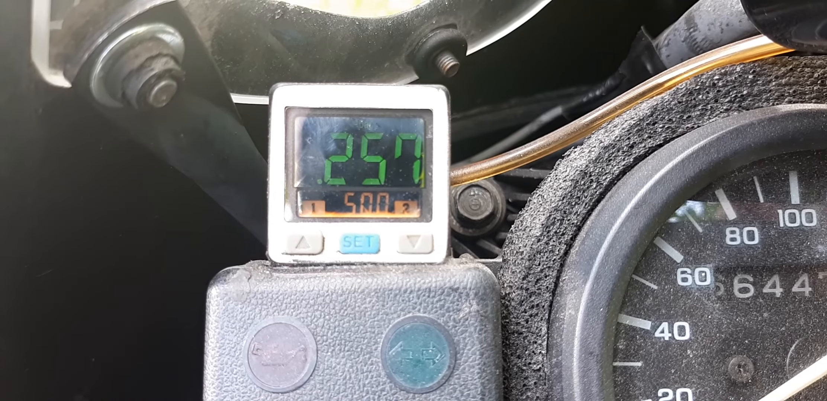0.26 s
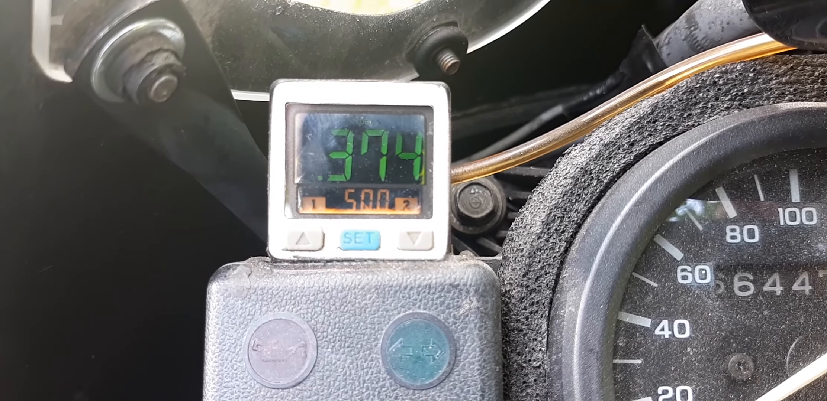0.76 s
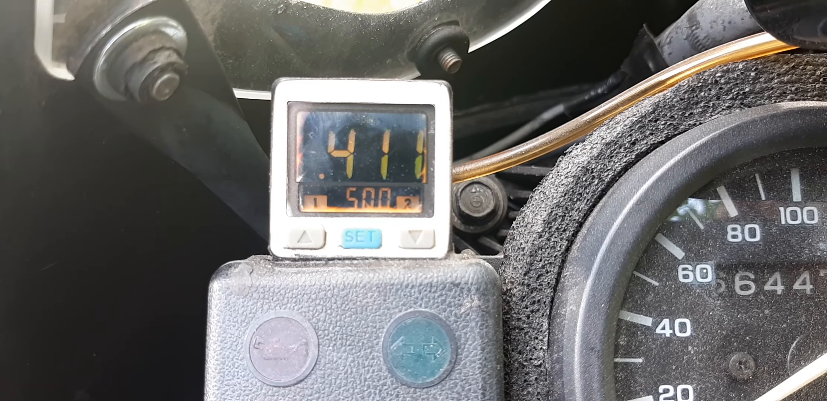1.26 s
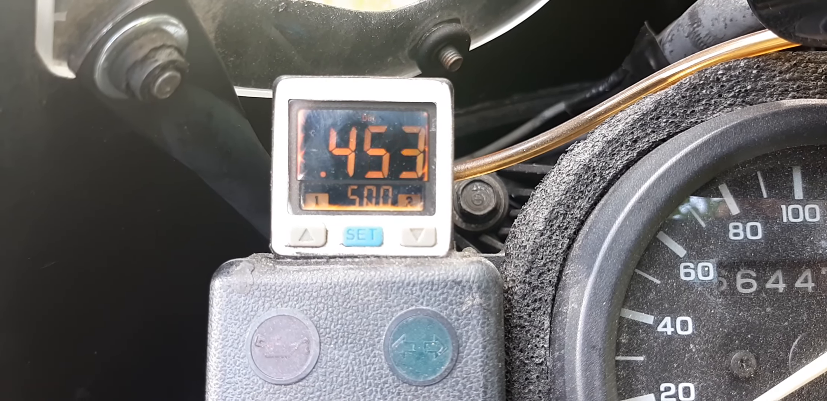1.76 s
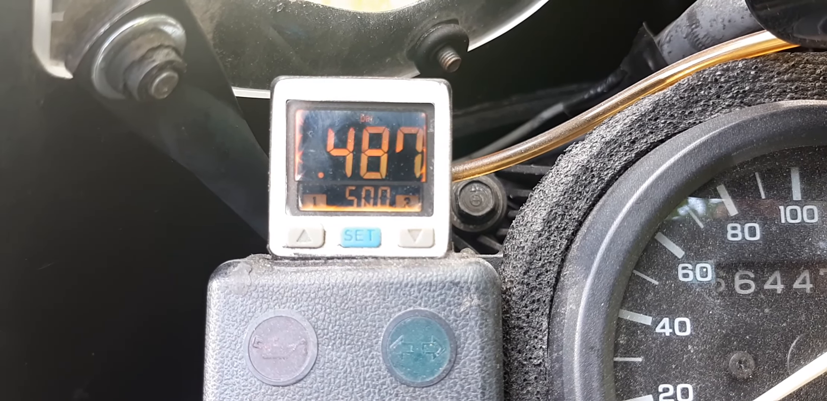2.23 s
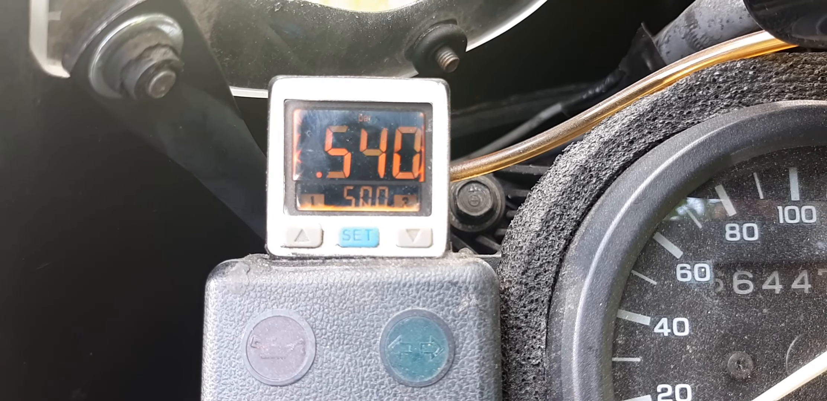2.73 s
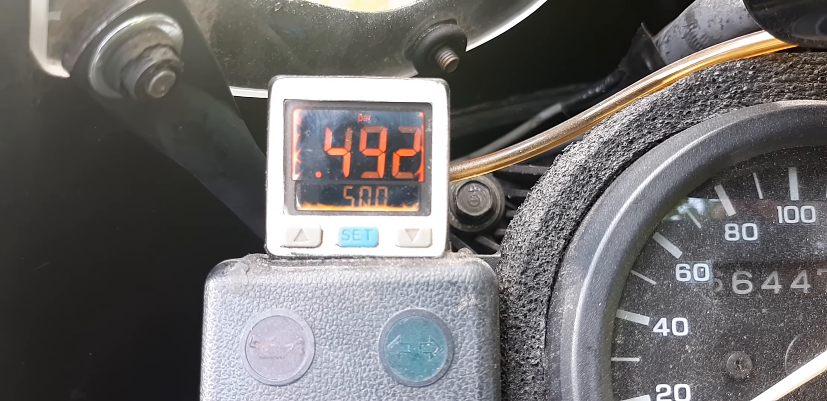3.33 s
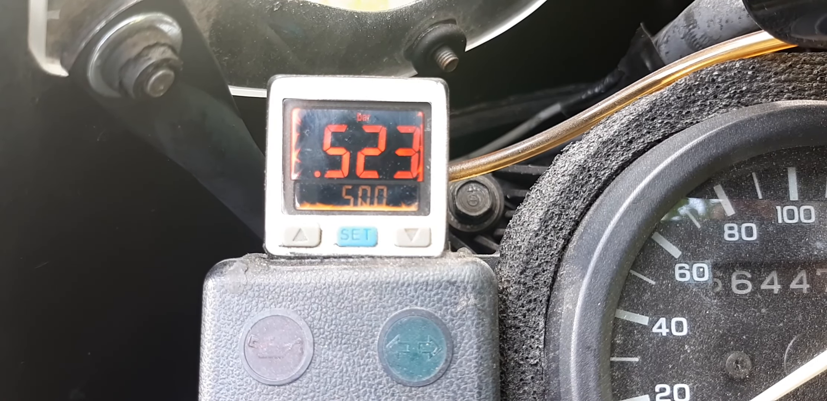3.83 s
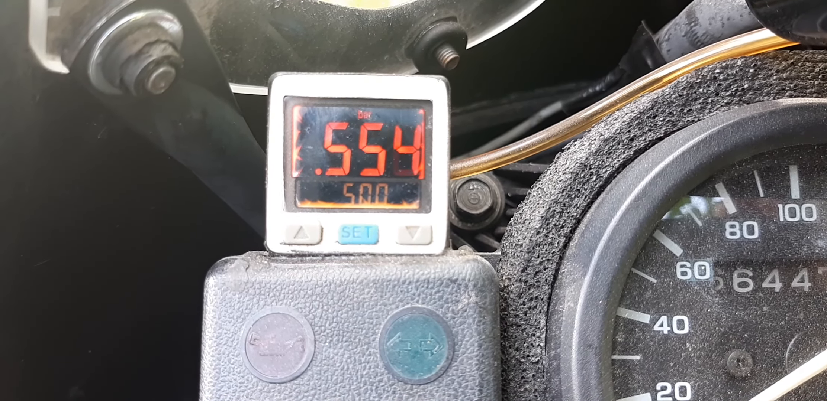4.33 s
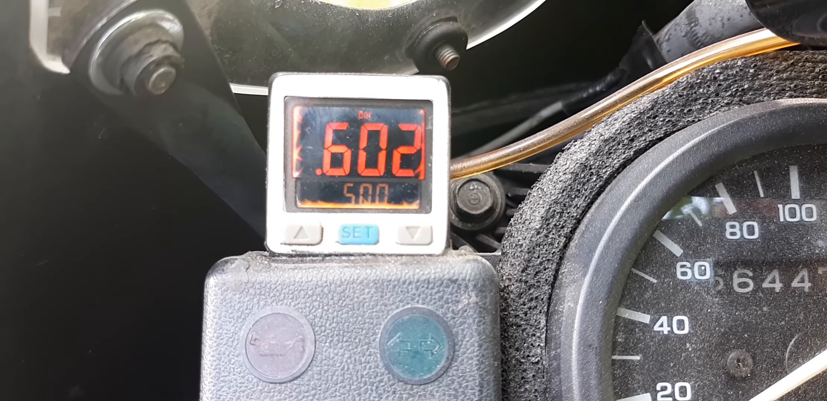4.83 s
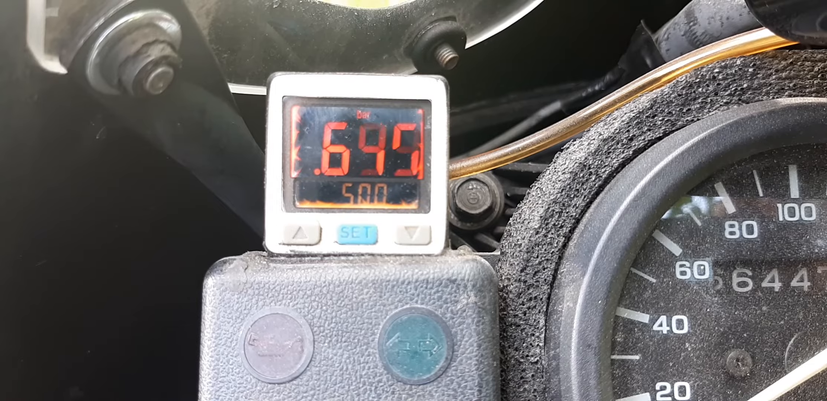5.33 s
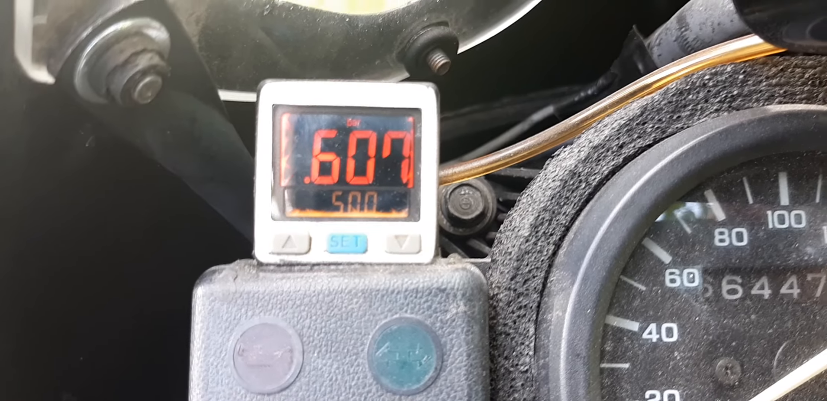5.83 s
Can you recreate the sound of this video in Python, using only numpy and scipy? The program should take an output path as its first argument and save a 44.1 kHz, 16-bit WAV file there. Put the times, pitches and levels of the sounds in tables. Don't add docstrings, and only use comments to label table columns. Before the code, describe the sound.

Close stereo pickup outdoors beside a motorcycle: a little piston pump chatters rapidly and evenly, buzzing and rasping, its tone shifting slightly as pressure builds. A crisp click switches it off, the piston stumbles through its last strokes and stops within a fraction of a second, air puffs out thinly, and a very quiet background of insects, tiny ticks and a brief far bird is left.

```python
import sys
import numpy as np
from scipy import signal
from scipy.io import wavfile
from scipy.ndimage import uniform_filter1d

SR = 44100
rng = np.random.default_rng(int(sys.argv[2]) if len(sys.argv) > 2 else 0)


def invert_db(level):
    return 10 ** (np.asarray(level, dtype=float) / 20)


def waveform_to_disk(signal):
    frames = np.transpose(np.atleast_2d(signal))
    scaled = np.clip(frames, -1, 1) * 32767
    samples = np.round(scaled).astype(np.int16)
    wavfile.write(sys.argv[1], SR, samples)


N = 268569
TIME = np.arange(N) / SR

# (time [s], speed [turns/s])
SPEED = [(0, 32.944), (.9, 32.859), (1.4, 32.744), (2.2, 32.831), (2.8, 33.111), (3.4, 33.2), (4.4, 33.5),
         (5.3, 33.725)]
# (time [s], position [turns])
COASTING = [(5.3205, 176), (5.368, 177), (5.385, 177.3), (5.43, 177.57), (5.481, 178), (5.56, 178.18),
            (6.1, 178.19)]
START_TURN, LAST_DRIVEN_S = -.0245, 5.2854
DRIVEN_TURNS = 175

# (place [turn], level at low pressure [dB], level at high pressure [dB], push +1 or pull -1)
AIR_PULSES = [(0, 6, 2, 1), (0.03, -6, -0.5, -1), (0.097, -4, -9, -1), (0.159, -2, -3, 1),
              (0.229, 0, -7, 1), (0.292, -5.5, -16.5, 1), (.565, -2, -7.5, 1), (0.604, -3.5, -1.5, -1),
              (0.96, -15, -18, -1)]
PANEL_KNOCKS = [(.01, 9, 1.5, 1), (.37, 9.5, 5, 1), (.72, 1, 8, 1), (.87, -12, -22, 1)]
REED_SLAPS = [(.235, 1, 3.5, 1), (.39, -10, -5.5, 1), (0.99, -18, -4.5, 1)]
BLASTS = [(-.01, -0.5, 1.5, 1), (.04, 3.5, -1.5, 1), (.44, -19.5, -10.5, 1), (.77, -28, -12.5, 1)]

# (pitch [Hz], width [Hz], level [dB], left-right balance [dB], left lead [rad], likeness of both sides [0-1])
HOUSING = [(183.6, 110, -15, 1, -1, 0.2), (275.3, 16, -4, -5.5, 2.9, 0.86), (310, 42, -5, -13.5, 3.5, 0.5),
           (474, 140, -0.5, 3.5, 0, 0.3), (580, 130, -8, -15, 1, 0), (634, 96, -15.5, 0, 4.5, 0.93),
           (860, 25, -15.5, 5.5, -2, 0), (1016, 160, -15.5, 6, 5.5, 0.98)]
PANEL = [(958, 224, -7, 3.5, 3.5, 0.72), (1280, 36, -3, -4, -2, 0.9), (1443.5, 76, 2, -10.5, 3, 0.96),
         (1482, 36, 3, 2.5, 3.5, 0.97)]
REED = [(1880, 36, 0, -4.1, -.2, .97), (2150, 200, -12, -.5, -.3, .7), (1670, 110, -14, -1, 2.5, .8)]
GEARBOX = [(2400, 600, -4, 0, 1.5, 1), (2944, 41, 4, 4, 3, 0.56), (3205, 180, -5.5, 0, -1.5, 0.3),
           (3804, 230, -3.5, 2.5, -1.6, 0.59), (4190, 72, -1.5, 3.5, -0.5, 0.11),
           (4580, 110, 1, -2.5, 1.5, 0.88), (5530, 2300, -16.5, 9, -0.5, 0.32),
           (10100, 5200, -21, -1, -11.5, 0.96)]
HEAD = [(2900, 2900, -11, 1, 0.5, 0.23), (5230, 460, 1.5, -3.5, -3.5, 0.31),
        (5867, 234, 0, -11, -1.04, 0.53), (6650, 170, -8.5, -1.5, -1.5, 0.32),
        (8200, 170, -18, 8.7, -0.2, 0.21), (8950, 120, -24.5, -8.5, 9, 0.6),
        (10120, 570, -9, -0.5, 4, 0.48), (11180, 170, -12.5, 6.5, -2, .35),
        (12130, 240, -3.5, -10, 1.77, .85), (12830, 2000, -13, -6, 3.5, 0.33),
        (15200, 1700, -25.5, 16, -9, .2)]
SWITCH_BODY = [(2200, 370, 5, -7, 0, 0.41), (3700, 290, 3, -3, 0.0059, 0.35),
               (6000, 750, 1.5, 0.5, 0.0035, 0.49), (8500, 2900, -10.5, -5, 0.0034, 0.36),
               (12200, 1900, -3.5, -2.5, 0.0042, 1), (15000, 2000, -20, -2, 0.0039, .4)]
LEAK_WHISTLE = [(5320, 160, 0, -2, 0, .5), (5900, 1400, -14, -2, 0, .3)]
OUTDOORS = [(60, 50, -13.5, -2, 0.0051, 1), (172, 160, -9, -2, 0.0077, 0.62), (415, 180, -13, -2, 0, 0.96),
            (754, 400, -20.5, -1, 0.0049, 0.6), (2000, 1500, -23.5, -0.3, 0, .2),
            (4700, 1500, -20.5, -1, 0.011, .1), (10100, 970, -10.5, -1, 0.005, .2),
            (10400, 900, -9.5, -1, 0.0088, .2), (13500, 3000, -23, -1.4, 0.0058, .1)]
FOLIAGE = [(3100, 650, 0, -1, 0, 0.14), (4300, 1400, -5, -1, 0, .2)]

# (multiple of crank rate [1], level at low pressure [dB], level at high pressure [dB])
HUM = [(2, -25.5, -40), (3, -25, -28.5), (4, -21.5, -13.5), (5, -11.5, -9), (6, -9, -6.5), (7, 2.5, -13),
       (8, -0.5, -1), (9, 1, -19), (10, -8, -13), (11, -18.5, -5.5), (12, -1, -5), (13, -9, -5),
       (14, 2.5, 1.5), (15, -1.5, -14), (16, -3, -8), (17, -2.5, -3), (18, 1, -6), (19, -10.5, -20.5),
       (20, -7.5, -20), (21, -14, -12), (22, -11, -13.5), (23, -37.5, -35.5), (24, -14, -7.5),
       (25, -10, -6.5), (26, -30.5, -15), (27, -18.5, -21), (28, -29, -29.5), (29, -32, -20),
       (30, -9.5, -26), (31, -5.5, -9.5)]
# (multiple [1], level at low pressure [dB], level at high [dB], left-right balance [dB], left lead [rad])
SHAFT_TONES = [(1.3, -39, -50.5, -0.5, -12.5), (2.41, -42.5, -45.5, -3.5, -10), (37, -22, -19, 3, -2.5),
               (43.12, -25.5, -33.5, 1.5, 6)]

# (time [s], knock level [dB])
KNOCK = [(0, -34.5), (1.3, -32), (2.6, -31.5), (3.6, -31), (5.29, -31.5)]
# (time [s], level [dB])
COAST = [(5.29, 0.5), (5.32, 1.5), (5.36, -12.5), (5.385, -2.5), (5.405, -15.5), (5.43, -12), (5.49, -19.5),
         (5.55, -38), (5.6, -58)]
REED_DB, BLAST_DB, GEAR_DB = (-32.5, -32), (-36.5, -42), (-42.5, -41.5)
REED_FOLLOWS, BLAST_FOLLOWS, GEAR_FOLLOWS = 0.7, .7, .9
VENT_S, VENT_TAKES_S, VENT_LOSS_DB = 5.322, 0.028, 11.5
UNMESH_TAKES_S, UNMESH_LOSS_DB = 0.027, 6.5
FREE_SWING_DB, FREEST_TURN = 3.5, 0.48

# (time [s], level [dB], time to fall 60 dB [s])
SNAP = [
    (5.289, -30.5, 0.022),
    (5.2925, -14, 0.0034),
    (5.294, -22.5, 0.0084),
    (5.321, -43.5, 0.045),
]
# (time [s], level [dB], time to fall 60 dB [s])
TICKS = [(5.552, -70, 0.016), (5.669, -63, .04), (5.851, -65.5, 0.028), (5.762, -75, .04),
         (5.955, -64.5, .04)]
# (time [s], length [s], level [dB])
LEAK = [
    (5.371, .032, -56),
    (5.444, .048, -53.5),
]
LEAK_EDGE_HZ, LEAK_TAIL_DB, LEAK_TAIL_T60_S = 60, -11.5, .15
# (time [s], length [s], pitch [Hz], glide [Hz], level [dB])
BIRD = [(5.84, .012, 3800, 300, -70), (5.85, .009, 4900, -50, -66), (5.857, .009, 3850, -100, -64),
        (5.867, 0.0081, 4000, -400, -55), (5.874, .024, 2850, 400, -73), (5.879, .02, 3900, 60, -78),
        (5.899, 0.016, 2700, 150, -68), (5.912, .012, 3000, 900, -64), (5.92, 0.02, 3050, -350, -73),
        (5.927, .012, 3600, 300, -79), (5.96, .012, 3600, -200, -76)]
WARBLE_HZ, SCATTER_HZ, SCATTER_DB = 120, 10, 1
OUTDOORS_DB = -69.5


def rms_scale(x):
    return np.sqrt(np.mean(x ** 2))


def rms_one(x):
    return x / np.sqrt(np.mean(x ** 2) + 1e-20)


def in_time(rows):
    s, *columns = np.transpose(rows)
    return [np.interp(TIME, s, column) for column in columns]


def wander(size, span):
    return rms_one(uniform_filter1d(rng.standard_normal(size), max(int(span), 1)))


def low(x, hz):
    return signal.sosfilt(signal.butter(2, hz, fs=SR, output="sos"), x)


def high(x, hz):
    return signal.sosfilt(signal.butter(2, hz, "high", fs=SR, output="sos"), x)


def resonate(shared, left, right, modes):
    out = np.zeros((2, N))
    for k, (hz, width_hz, level_db, pan_db, lead, alike) in enumerate(modes):
        r = np.exp(-np.pi * width_hz / SR)
        w = 2 * np.pi * hz / SR
        alike = np.clip(alike, 0, 1)
        gain = (-1) ** k * invert_db(level_db)
        for ch, (own, side) in enumerate([(left, .5), (right, -.5)]):
            drive = np.sqrt(alike) * shared + np.sqrt(1 - alike) * own + 1e-18
            b = (1 - r) * np.array([np.sin(side * lead), r * np.sin(w - side * lead)])
            ring = signal.lfilter(b, [1, -2 * r * np.cos(w), r * r], drive)
            out[ch] += gain * invert_db(side * pan_db) * ring
    return out


def crank():
    driven = START_TURN + np.cumsum(in_time(SPEED)[0]) / SR
    coasting = in_time([(LAST_DRIVEN_S, DRIVEN_TURNS)] + list(COASTING))[0]
    return np.where(TIME < LAST_DRIVEN_S, driven, coasting)


def tank_pressure():
    return np.clip(crank() / DRIVEN_TURNS, 0, 1)


def powered():
    switched_off = 1. * (TIME >= SNAP[1][0])
    return np.clip(1 - low(switched_off, 12.0), 0, 1)


def effort():
    pressure, fade_db = tank_pressure(), in_time(COAST)[0]
    rising = lambda db: db[0] + (db[1] - db[0]) * pressure
    vented = np.clip((TIME - VENT_S) / VENT_TAKES_S, 0, 1)
    slack = np.clip((TIME - SNAP[1][0]) / UNMESH_TAKES_S, 0, 1)
    knock_db = in_time(KNOCK)[0] + fade_db
    reed_db = rising(REED_DB) + REED_FOLLOWS * fade_db
    blast_db = rising(BLAST_DB) + BLAST_FOLLOWS * fade_db - VENT_LOSS_DB * vented
    gear_db = rising(GEAR_DB) + GEAR_FOLLOWS * fade_db - UNMESH_LOSS_DB * slack
    return knock_db, reed_db, blast_db, gear_db


def contacts(table, jitter, slow_jitter, uneven_db, shift=0):
    turns, clicks = crank(), np.zeros(N + 1)
    stroke = np.arange(-1, 179)
    pressure = np.clip(stroke / DRIVEN_TURNS, 0, 1)
    play = shift * pressure + slow_jitter * wander(len(stroke), 20)
    for turn, early_db, late_db, sign in table:
        angle = stroke + turn + play + jitter * rng.standard_normal(len(stroke))
        level_db = early_db + (late_db - early_db) * pressure + uneven_db * rng.standard_normal(len(stroke))
        size = np.sign(sign) * invert_db(level_db)
        inside = (angle > turns[0]) & (angle < turns[-1])
        at = np.interp(angle[inside], turns, np.arange(N))
        np.add.at(clicks, at.astype(int), size[inside] * (1 - at % 1))
        np.add.at(clicks, at.astype(int) + 1, size[inside] * (at % 1))
    return clicks[:N]


def hum(knock_db):
    turns, out = crank(), np.zeros((2, N))
    pressure = tank_pressure()
    pulse_turn, early_db, late_db, sign = np.transpose(AIR_PULSES)
    for k, low_db, high_db in HUM:
        k = round(k)
        early, late = invert_db([early_db, late_db]) @ (np.sign(sign) * np.exp(-2j * np.pi * k * pulse_turn))
        timing = np.angle(early + (late - early) * pressure)
        level = invert_db(low_db + (high_db - low_db) * pressure)
        lead = np.interp(k, [7, 22, 30], [-.15, .15, 1.5])
        pan_db = np.interp(k, [2.5, 14, 24, 30], [-2.0, -3.5, -10, -4.5])
        for ch, side in enumerate([.5, -.5]):
            tone = np.cos(2 * np.pi * k * turns + timing + side * lead)
            out[ch] += level * invert_db(side * pan_db) * tone
    return invert_db(knock_db + 0.1) * rms_one(out) * powered()


def piston(knock_db):
    clicks = contacts(AIR_PULSES, jitter=0.0045, slow_jitter=0.0014, uneven_db=6.0)
    noise = rng.standard_normal((3, N))
    gusts = rms_one(low(np.abs(clicks), 49)) * noise[0]
    coasting = 1 - powered()
    coasting_drive = 0.44 * rms_one(clicks) + invert_db(-5.5) * gusts + 0.45 * noise[2]
    drive = invert_db(-11.5) * gusts * powered() + coasting * coasting_drive
    usual = rms_scale(resonate(low(noise[1], 1500), 0, 0, HOUSING))
    housing = resonate(low(drive, 2600), 0, 0, HOUSING) / usual
    frame_thud = rms_one(low(low(clicks + invert_db(-25) * gusts, 380), 380))
    housing = housing + invert_db(-7.5) * coasting * frame_thud
    return invert_db(knock_db) * high(housing, 150)


def shaft(knock_db):
    turns, out = crank(), np.zeros((2, N))
    pressure = tank_pressure()
    for multiple, early_db, late_db, pan_db, lead in SHAFT_TONES:
        level_db = early_db + (late_db - early_db) * pressure + 1.5 * wander(N, 4000)
        for ch, side in enumerate([.5, -.5]):
            tone = np.sin(2 * np.pi * multiple * turns + side * lead)
            out[ch] += invert_db(level_db + side * pan_db) * tone
    return invert_db(knock_db + 10.5) * out * powered()


def struck(table, modes, soft_hz, shift, rough_db):
    clicks = contacts(table, jitter=.0007, slow_jitter=.002, uneven_db=1.1, shift=shift)
    turbulence = rms_one(low(np.abs(clicks), 15) * rng.standard_normal((3, N)))
    strike = (0.63 + 0.47 * powered()) * rms_one(clicks)
    roughness = invert_db(rough_db) + 1.4 * (1 - powered())
    shared = low(strike + roughness * turbulence[0], soft_hz)
    left, right = low(turbulence[1:], soft_hz)
    return high(resonate(shared, left, right, modes), 600)


def valves(reed_db):
    panel = struck(PANEL_KNOCKS, PANEL, 2800, shift=0.0086, rough_db=-20.5)
    reed = struck(REED_SLAPS, REED, 1100, shift=-.05, rough_db=-33)
    reed = reed * invert_db(FREE_SWING_DB * np.cos(2 * np.pi * (crank() - FREEST_TURN)))
    both = invert_db(4.0) * rms_one(panel) + (0.37 + 0.66 * powered()) * rms_one(reed)
    return invert_db(reed_db) * rms_one(both)


def bursts(clicks, fast_s, slow_s, slow_db, grain_db):
    fade = lambda s: signal.lfilter([1], [1, -invert_db(-60 / (s * SR))], clicks)
    envelope = low(fade(fast_s) + invert_db(slow_db) * fade(slow_s), 330)
    grain = invert_db(grain_db * np.minimum(rng.exponential(1, N), 4))
    return envelope * grain * rng.standard_normal((3, N))


def blast(blast_db):
    clicks = contacts(BLASTS, jitter=0.018, slow_jitter=.003, uneven_db=1.74)
    puffs = bursts(clicks, fast_s=0.031, slow_s=.12, slow_db=-30.5, grain_db=1.6)
    return invert_db(blast_db) * rms_one(high(resonate(*puffs, HEAD), 1500))


def gears(gear_db):
    turns = crank()
    place = (turns % 1 * 1024).astype(int)
    flaws = rng.standard_normal((3, 2, 1024))[:, :, place]
    wear = turns / 90
    repeating = np.cos(wear) * flaws[:, 0] + np.sin(wear) * flaws[:, 1]
    ripple_db = 2.5 * np.cos(2 * np.pi * 10 * turns) + 1.4 * np.cos(2 * np.pi * (turns - .1))
    drive = invert_db(ripple_db) * (repeating + invert_db(-4.5) * rng.standard_normal((3, N)))
    return invert_db(gear_db) * rms_one(high(resonate(*drive, GEARBOX), 900))


def outdoors():
    return invert_db(OUTDOORS_DB) * rms_one(resonate(*rng.standard_normal((3, N)), OUTDOORS))


def snaps(events, modes):
    drive = np.zeros((3, N))
    for s, level_db, t60 in events:
        age = np.maximum(TIME - s, 0)
        fading = invert_db(level_db - np.minimum(60 * age / t60, 300))
        drive += (TIME >= s) * fading * rng.standard_normal((3, N))
    return invert_db(17) * high(resonate(*drive, modes), 200)


def switch():
    return snaps(SNAP, SWITCH_BODY)


def leak():
    gate = np.zeros(N)
    for s, length, level_db in LEAK:
        after = np.clip(TIME - s - length, 0, 1)
        tail_db = (after > 0) * (LEAK_TAIL_DB - 60 * after / LEAK_TAIL_T60_S)
        gate += (TIME > s) * invert_db(level_db + tail_db)
    whistle = rms_one(resonate(*rng.standard_normal((3, N)), LEAK_WHISTLE))
    return low(gate, LEAK_EDGE_HZ) * whistle


def cooling_ticks():
    return low(snaps(TICKS, GEARBOX + PANEL + HOUSING), 6000)


def bird():
    song, waver = np.zeros(N), WARBLE_HZ * low(wander(N, 100), 300)
    for s, length, hz, glide_hz, level_db in BIRD:
        done = np.clip((TIME - s) / length, 0, 1)
        pitch = hz + glide_hz * done + waver
        song += invert_db(level_db) * np.sin(np.pi * done) * np.sin(2 * np.pi * np.cumsum(pitch) / SR)
    song *= 1.36 + .4 * low(wander(N, 40), 300)
    echoed = []
    for lag in (390, 530):
        echoed.append(song + invert_db(-10) * (np.roll(song, lag) + np.roll(song, 3 * lag)))
    leaves = rms_one(resonate(*rng.standard_normal((3, N)), FOLIAGE))
    scatter = low(np.abs(song), SCATTER_HZ) * leaves
    return np.array(echoed) + invert_db(SCATTER_DB) * scatter


def scene():
    knock_db, reed_db, blast_db, gear_db = effort()
    compressor = hum(knock_db) + piston(knock_db) + shaft(knock_db)
    compressor = compressor + valves(reed_db) + blast(blast_db) + gears(gear_db)
    return compressor + outdoors() + switch() + leak() + cooling_ticks() + bird()


def band_limit(x):
    return signal.sosfilt(signal.butter(12, 16500, fs=SR, output="sos"), x)


def record(dry):
    top_cut = signal.cheby2(16, 40, 16000, fs=SR, output="sos")
    mix = signal.sosfilt(top_cut, dry)
    return band_limit(mix)


dry = scene()
out = record(dry)
waveform_to_disk(out)
```